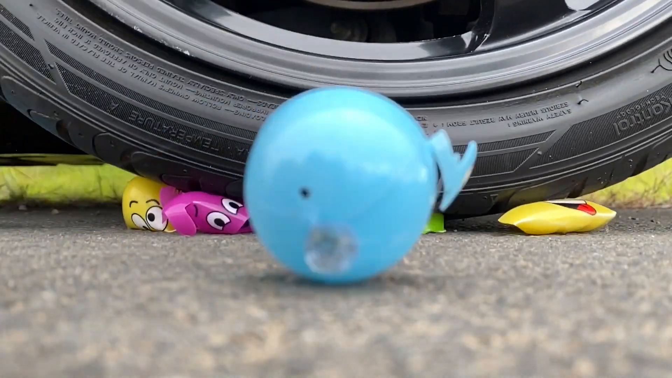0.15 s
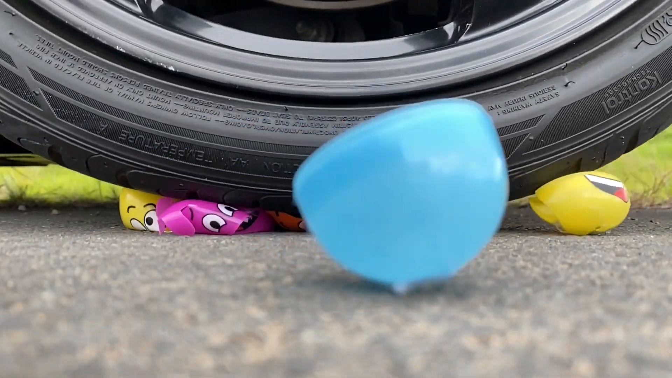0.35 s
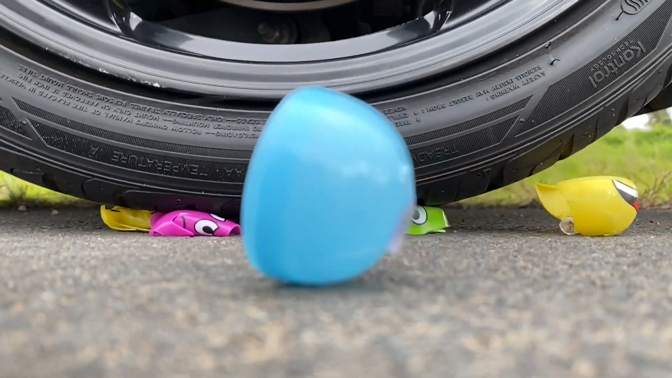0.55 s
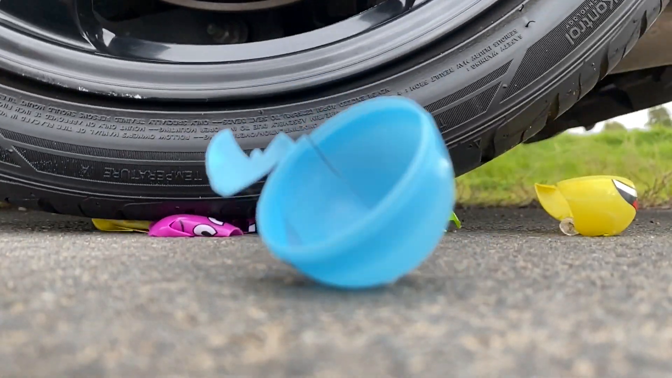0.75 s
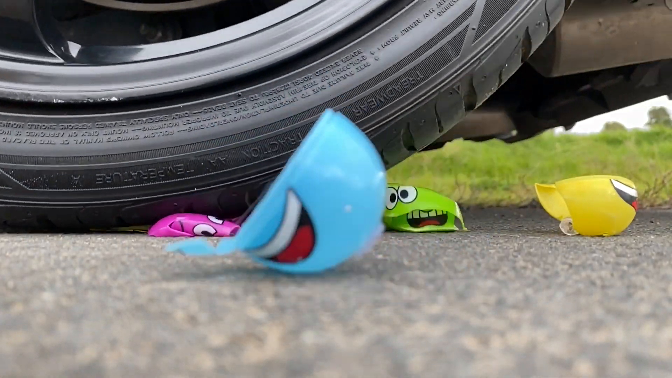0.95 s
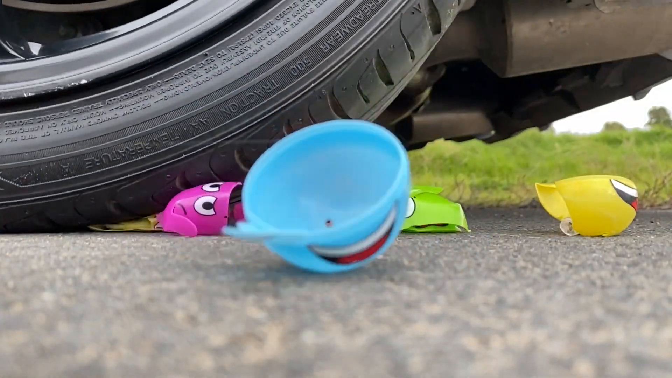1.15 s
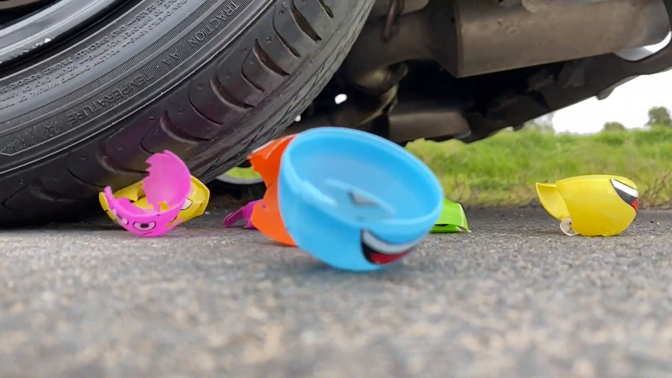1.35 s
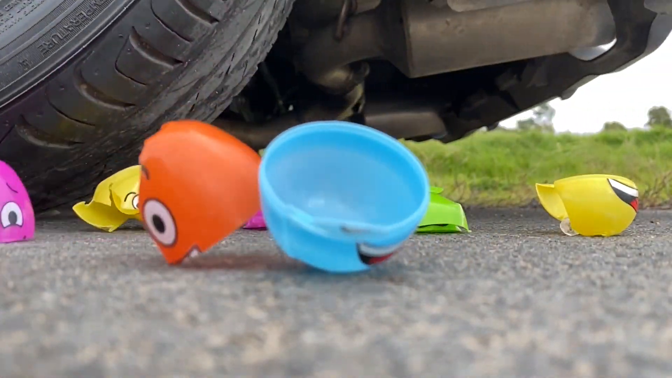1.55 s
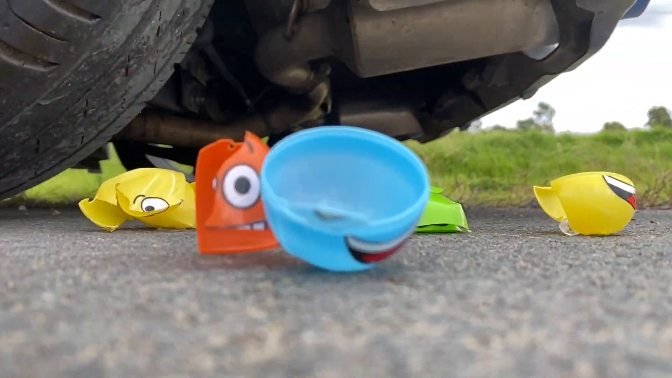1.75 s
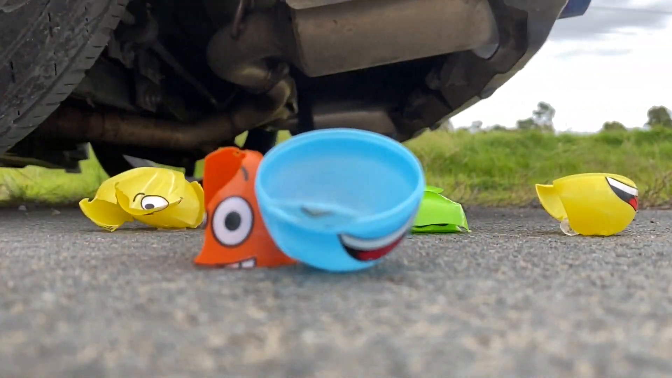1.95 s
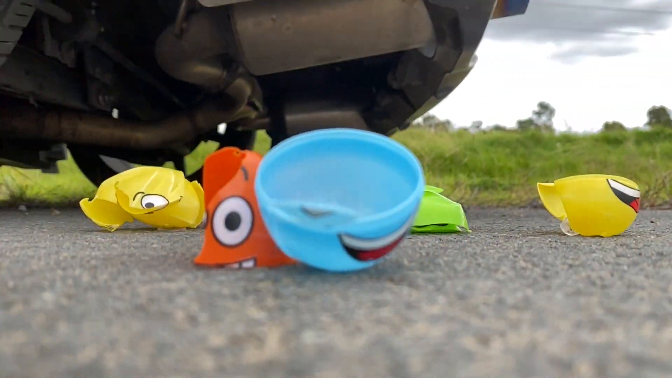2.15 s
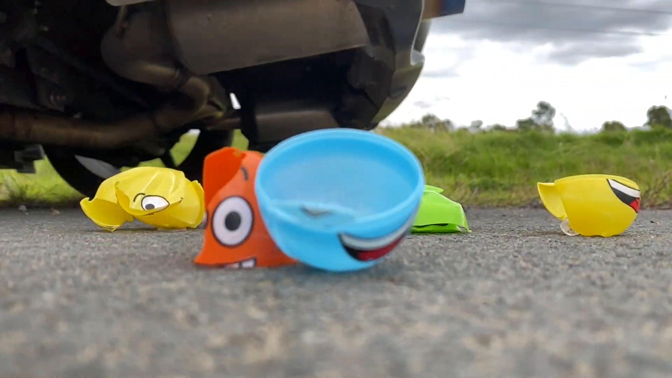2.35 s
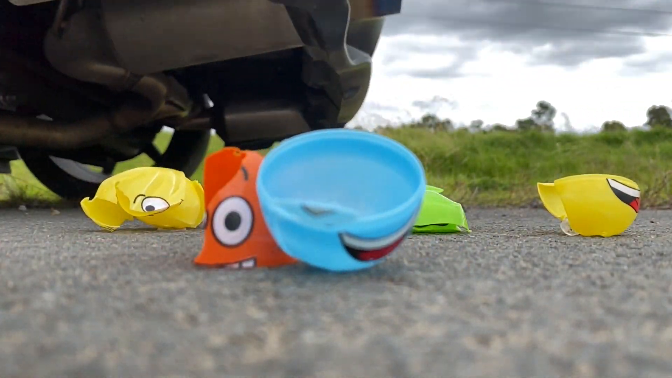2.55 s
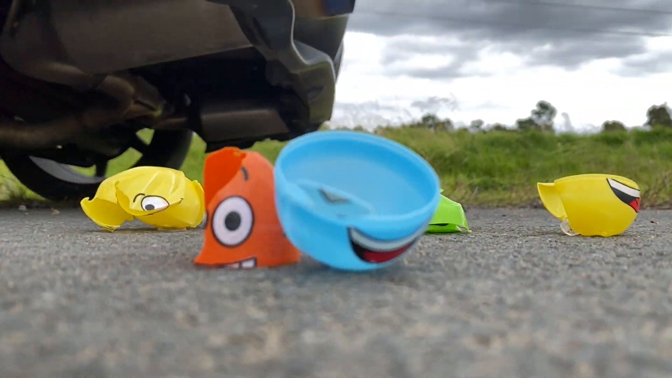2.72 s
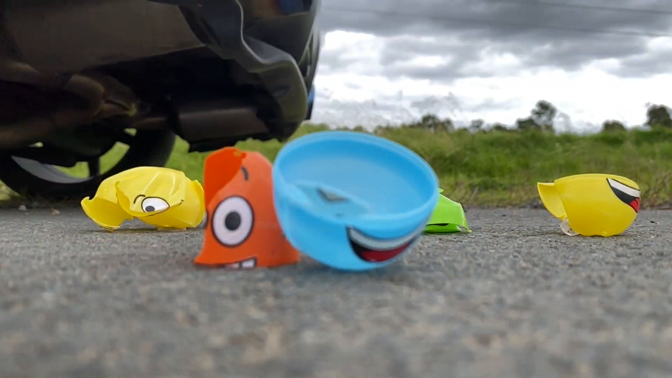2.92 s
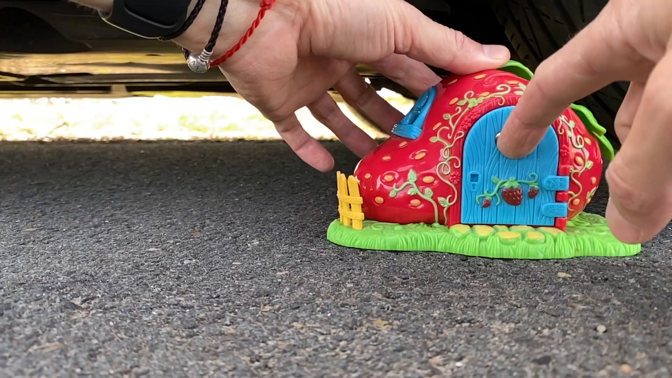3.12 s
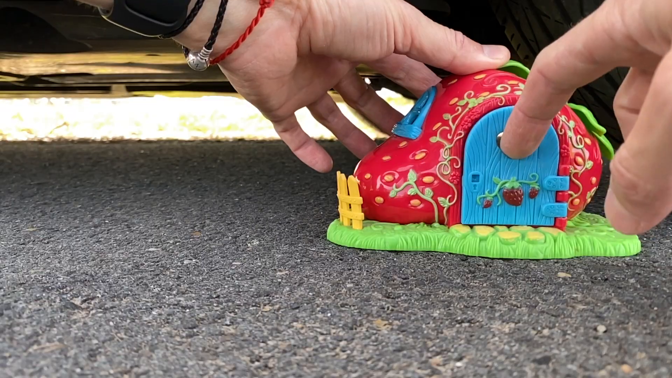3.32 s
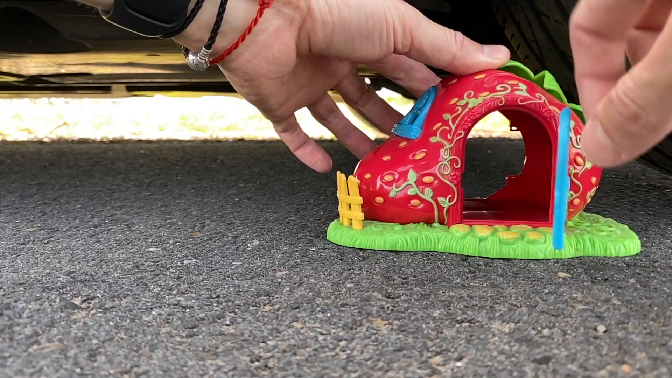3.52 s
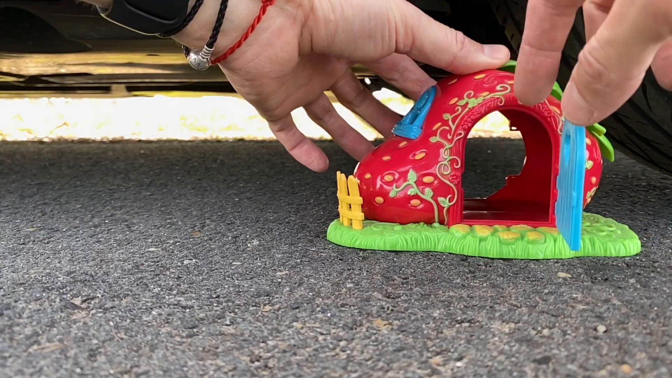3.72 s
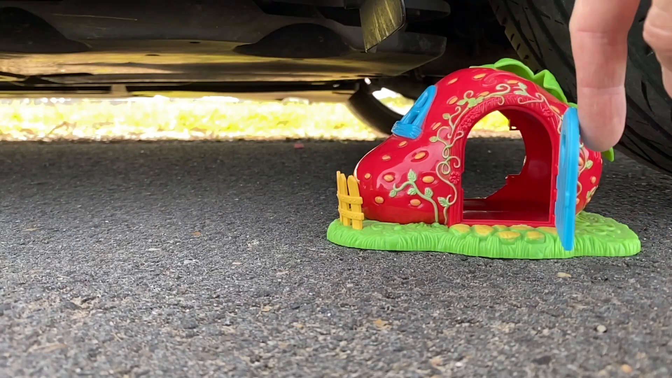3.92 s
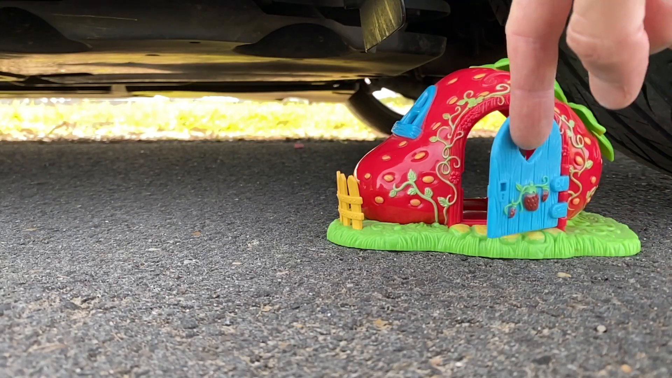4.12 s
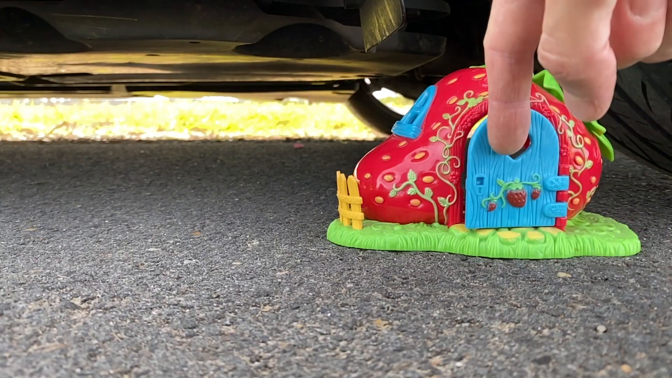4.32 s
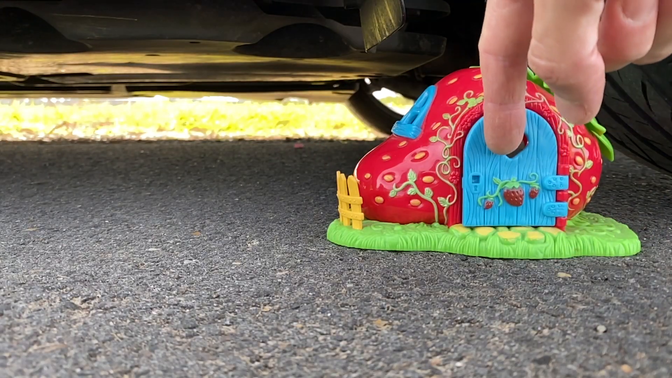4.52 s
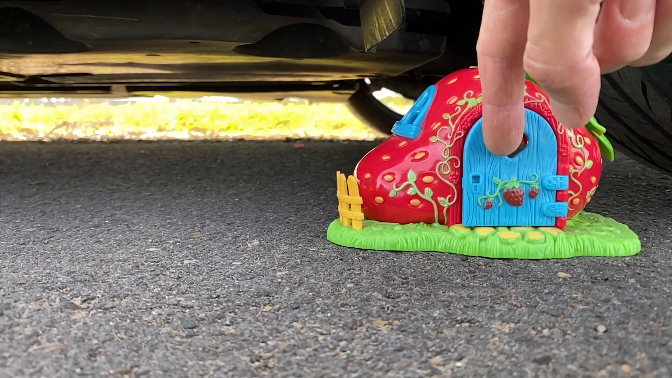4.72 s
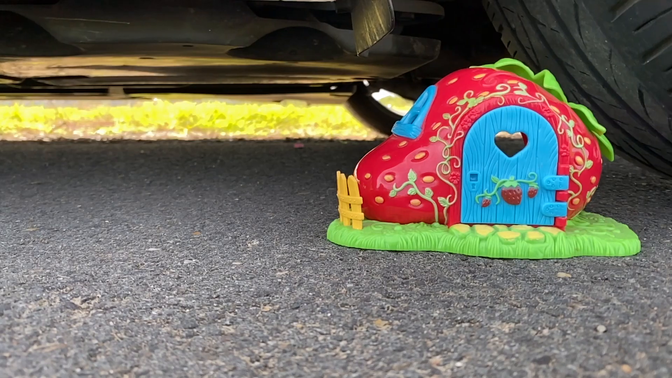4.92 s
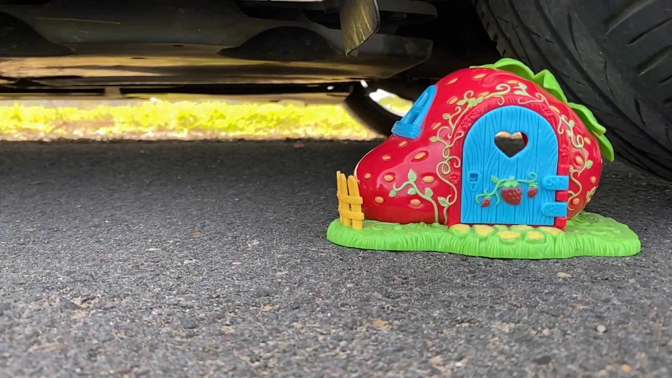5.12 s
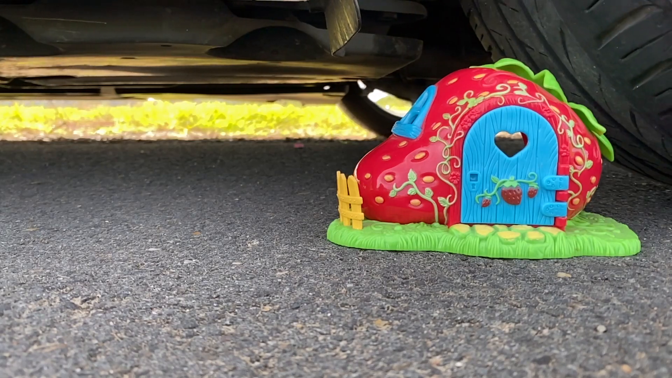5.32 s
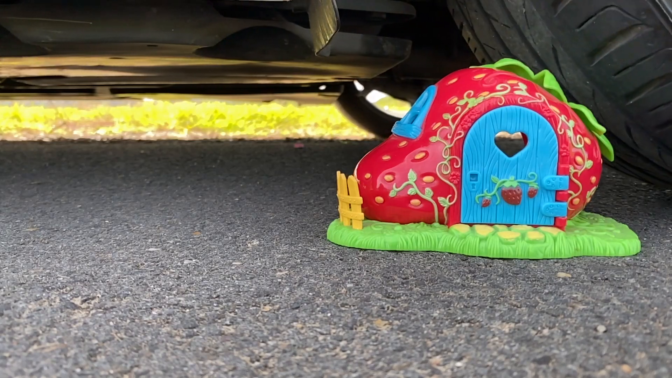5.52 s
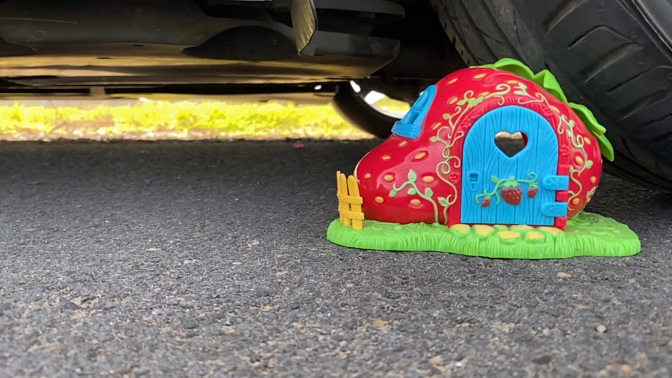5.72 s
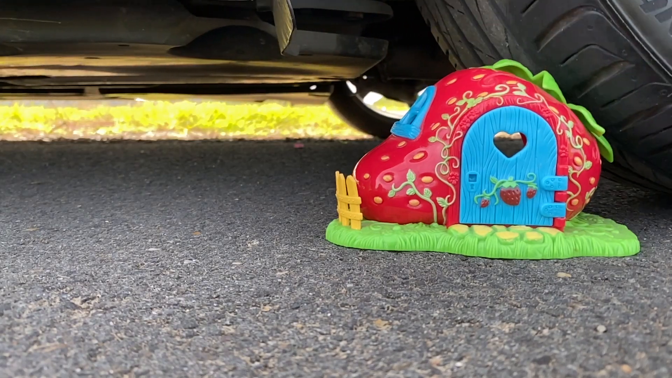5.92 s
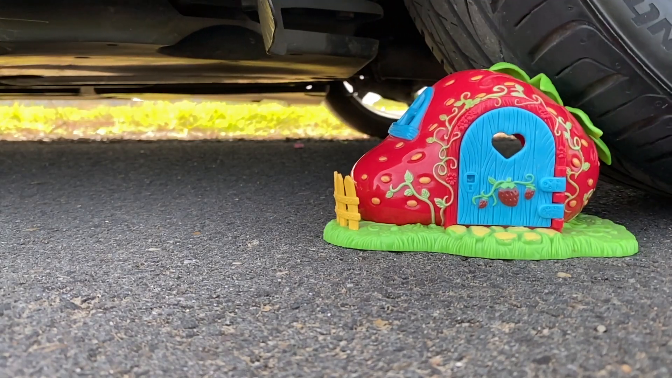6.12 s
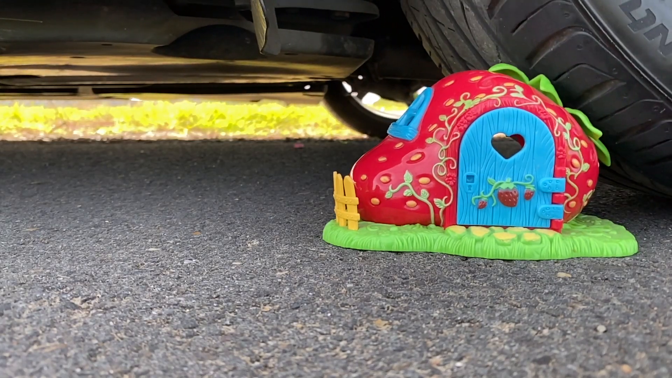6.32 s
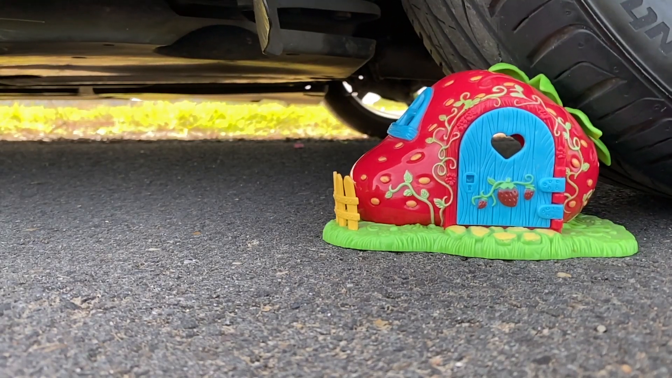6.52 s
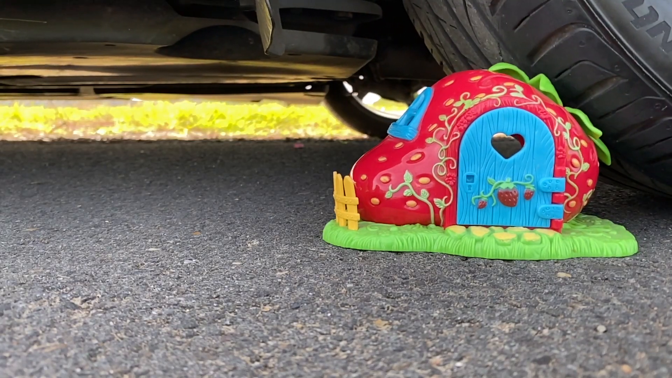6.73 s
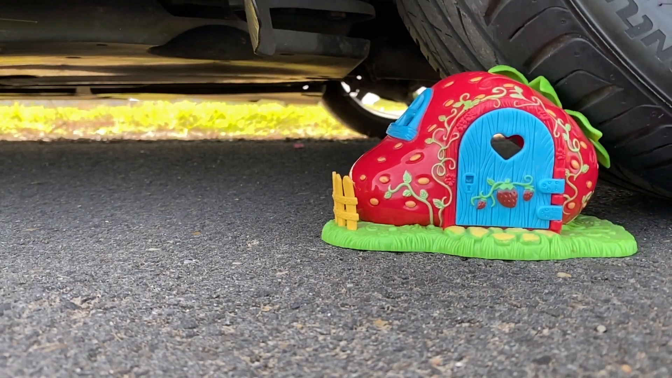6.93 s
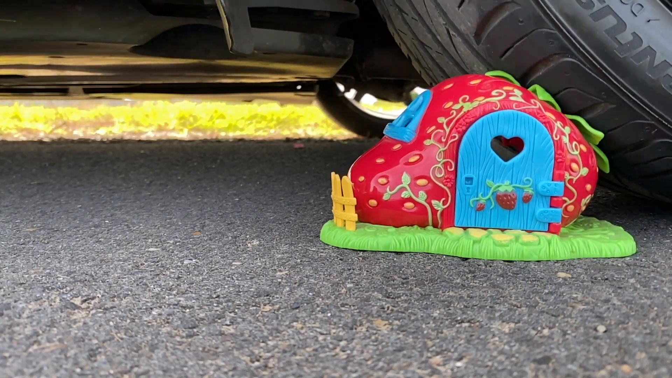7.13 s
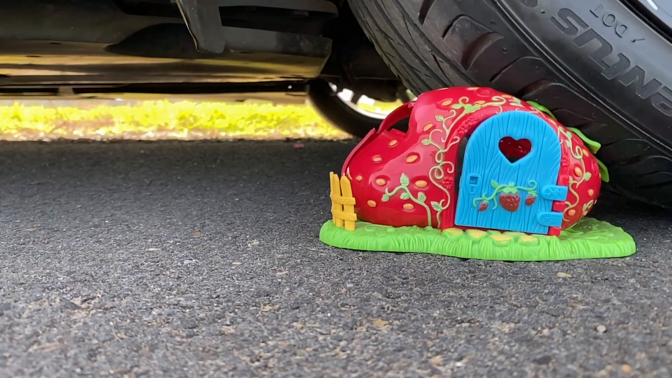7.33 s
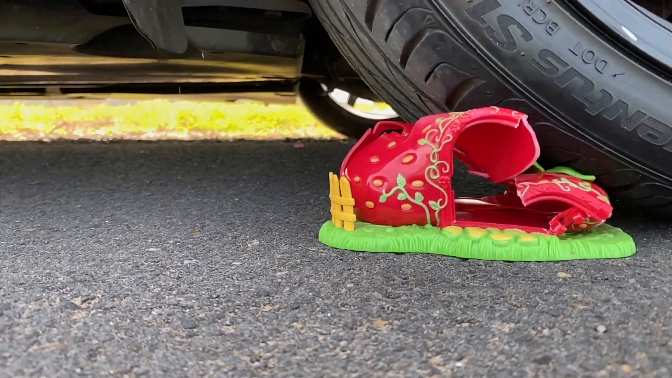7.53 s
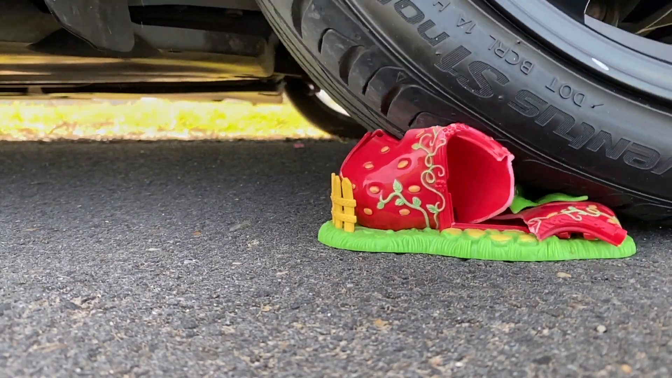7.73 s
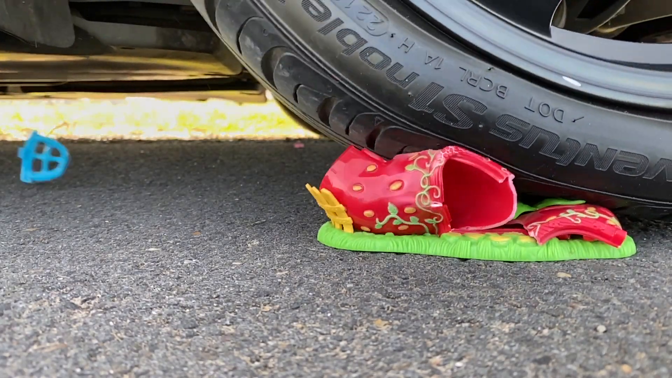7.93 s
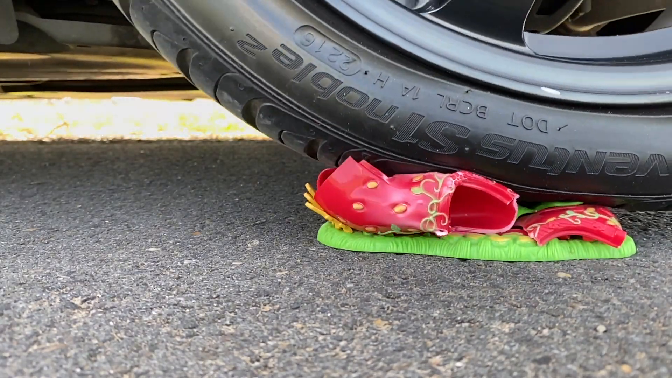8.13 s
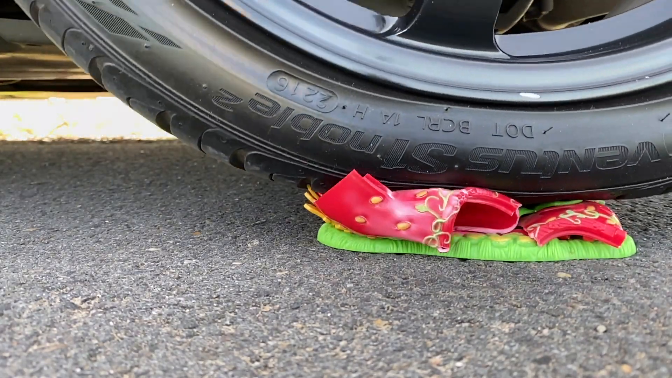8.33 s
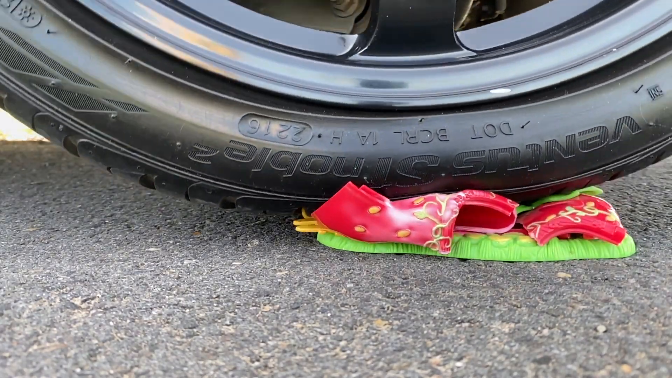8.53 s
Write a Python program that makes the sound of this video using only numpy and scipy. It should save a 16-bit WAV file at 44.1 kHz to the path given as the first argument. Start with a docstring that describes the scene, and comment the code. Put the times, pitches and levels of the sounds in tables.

```python
"""Three moments joined end to end, heard by a microphone on the asphalt beside a tyre.
First an idling car creeps over hollow plastic shells: firing-rate tones, snaps and hollow knocks (0 to 3.1 s).
Then, engine off, fingers tap and move the squeaky door of a toy house in light wind (to 4.8 s).
Last the engine is back and the car crushes the house, with bursting cracks and stick-slip creaks (to 8.7 s).
Wind and far traffic are shaped noise throughout; the loudest cracks overload the microphone."""
import sys
import numpy as np
from scipy import signal
from scipy.fft import rfft, irfft, next_fast_len
from scipy.io import wavfile
from scipy.ndimage import uniform_filter1d

SR = 44100
rng = np.random.default_rng(int(sys.argv[2]) if len(sys.argv) > 2 else 0)


def generate_wav(sig):
    """Save sig (samples, or channels by samples) to the path in sys.argv[1] as 16-bit PCM at SR."""
    pcm = np.round(np.clip(np.atleast_2d(sig).T, -1, 1) * 32767).astype(np.int16)
    wavfile.write(sys.argv[1], SR, pcm)


N = 381906
T = np.arange(N) / SR  # time of every sample, s


def undb(db):
    """Gain from dB."""
    return 10 ** (np.asarray(db) / 20)


def unit(x):
    """Scale to rms 1."""
    return x / np.sqrt(np.mean(x ** 2))


def curve(rows):
    """Interpolate the columns of (time_s, ..) rows at every sample."""
    s, *columns = np.transpose(rows)
    return [np.interp(T, s, c) for c in columns]


def gate(t0, t1, fade_s=0.0033):
    """1 between two times, with short linear fades outside them."""
    return np.clip(np.minimum(T - t0 + fade_s, t1 - T + fade_s) / fade_s, 0, 1)


def fade(t60):
    """0.2 s of decay that falls 60 dB in t60 s."""
    return 1000. ** (-np.arange(SR // 5) / (SR * t60))


def band(x, hz, width):
    """Two-pole resonance, gain 1 at the centre."""
    return signal.lfilter(*signal.iirpeak(min(hz, .4 * SR), hz / width, fs=SR), x)


def coloured(points):
    """Noise with a (pitch_hz, level_db) spectrum, rms 1."""
    hz, db = np.transpose(points)
    n = next_fast_len(N)
    f = np.maximum(np.arange(n // 2 + 1) * SR / n, 1)
    shape = undb(np.interp(np.log(f), np.log(hz), db))
    return unit(irfft(rfft(rng.standard_normal(n)) * shape, n)[:N])


def walk(rate):
    """Random wander with about rate new values per second, rms 1."""
    k = int(SR / rate)
    steps = np.repeat(rng.standard_normal(N // k + 1), k)
    return unit(uniform_filter1d(uniform_filter1d(steps, k), k)[:N])


def wraps(phase):
    """A unit pulse each time the phase passes a whole number."""
    return np.diff(np.floor(phase), prepend=0)


def add(out, s, x):
    """Mix x into out from time s."""
    i = int(s * SR)
    out[i:i + len(x)] += x[:N - i]


def engine():
    """Exhaust boom on the firing multiples, weaker half lines, a rasp of higher lines and engine bay noise."""
    # engine speed, one list per moment: time_s, firing_rate_hz, boom_level_db
    running = [
        [(0, 31.46, -0.5), (.27, 28.21, -4), (.52, 31.22, 0.5), (.75, 34.4, -0.5), (1.1, 33.17, 0),
         (1.59, 36.7, 1), (2.18, 37.74, 1.5), (2.75, 41.38, -0.5), (3.13, 41.42, -1.5)],
        [(4.82, 32.32, -4), (5.35, 34.35, -2.5), (5.75, 35.05, -3), (6.15, 34.47, -3), (6.58, 32.52, -3.5),
         (7.2, 28.76, -6.5), (7.45, 29.66, 2), (7.8, 35, 4.5), (8.06, 35.98, 3.5), (8.5, 30.64, -2.5),
         (8.66, 30.17, -1)],
    ]
    # balance, one list per moment: time_s, bay_noise_db, rasp_db, boom_tilt_db_per_octave (around 100 Hz),
    # half_lines_db
    bay_levels = [
        [(0, -41, -57, 2.5, -6), (1.3, -49, -46, -0.5, -14.5), (3.13, -47.5, -43, -2, -18.5)],
        [(4.82, -46.5, -57.5, 6, -6.5), (7.0, -46, -60.5, 3.5, -7), (8.66, -38.5, -60, 0.5, -7)],
    ]
    # exhaust pipe response to a firing multiple: pitch_hz, gain_db
    exhaust = [(30, -46), (36, -33.5), (42, -21), (60, -31), (73, -20.5), (86, -11), (97, -16), (108, -22),
               (121, -34), (143, -27), (160, -24.5), (185, -37)]
    # exhaust rasp resonances: pitch_hz, width_hz, level_db
    buzz = [(205, 55, 3.5), (271.5, 29, -6), (419, 93, 2.5)]
    # engine bay noise spectrum: pitch_hz, level_db (per Hz)
    clatter = [(150, -31), (200, -8), (310, -22.5), (505, -21), (800, -28), (1440, -27), (2650, -36),
               (9000, -49), (14000, -63)]
    out = 0
    pipe_hz, pipe_db = np.transpose(exhaust)
    for speed, levels in zip(running, bay_levels):
        hz, boom_db = curve(speed)
        noise_db, rasp_db, tilt_db, half_db = curve(levels)
        phase = np.cumsum(hz * (1 + .003 * walk(12))) / SR

        def tone(k, db):
            """Sine on k times the firing rate, weighted by the pipe."""
            pipe = np.interp(np.log(k * hz), np.log(pipe_hz), pipe_db)
            level_db = boom_db + db + tilt_db * np.log2(k * hz / 100) + pipe
            return np.sqrt(2) * undb(level_db) * np.sin(2 * np.pi * (k * phase + rng.random()))

        boom = sum(tone(k + 1, 1.2 * walk(9)) for k in range(5))
        # uneven cylinders add lines halfway between the multiples
        boom = boom + sum(tone(k + .5, half_db) for k in range(3, 6))
        # one pulse per two firings gives lines on every half multiple
        pulses = wraps(phase / 2) * undb(1.6 * walk(27)) + 1.2 * wraps(phase)
        # the silencer smears each pulse over the cycle
        pulses = signal.fftconvolve(pulses, rng.standard_normal(SR // 5) * fade(0.093))[:N]
        pulses = unit(pulses) * (1 + 0.36 * walk(250))
        rasp = sum(undb(db) * unit(band(band(pulses, f, w), f, w)) for f, w, db in buzz)
        # the bay noise swells slightly with each firing
        noise = coloured(clatter) * (1 + 0.076 * np.cos(2 * np.pi * phase)) * undb(.7 * walk(15))
        sound = boom + rasp * undb(rasp_db) + noise * undb(noise_db)
        out = out + gate(speed[0][0], speed[-1][0]) * sound
    return out


def outdoors():
    """Low noise in gusts on the microphone, and steadier noise of far traffic."""
    # wind spectrum: pitch_hz, level_db (per Hz)
    wind = [(12, -5.5), (24, -8), (113, -25.5), (300, -51.5), (800, -110)]
    # gust strength ahead of its quick flutter: time_s, level_db
    gusts = [(3.2, -41), (3.8, -47), (4.3, -36.5), (4.8, -45)]
    # far traffic spectrum: pitch_hz, level_db (per Hz)
    traffic = [(150, -37.5), (250, -11.5), (800, -11), (2000, -23), (11000, -71.5)]
    blowing = coloured(wind) * undb(curve(gusts)[0] + 5.9 * walk(13))
    return blowing + coloured(traffic) * undb(-69 + 0.6 * walk(4))


def crunch(rate=700, spread_db=4.5):
    """Dense small splinter clicks (rate per s in each band) of random size and colour."""
    # splintering between the cracks, one list per moment: time_s, level_db (before the bands are summed)
    splintering = [
        [(0, -39.5), (.3, -57), (.7, -60.5), (1.2, -47.5), (1.95, -69)],
        [(6.8, -71), (7.3, -43), (8.0, -42), (8.66, -44.5)],
    ]
    out = 0
    tail = np.exp(-np.arange(400) / (0.0012 * SR))
    for hz, db in ((1500, 4.5), (3300, 1.5), (7500, -5.0), (11500, -14.0)):
        chance = rng.random((N, 2)).T
        clicks = (chance[0] < rate / SR) * undb(-spread_db * np.log(chance[1] + 0.014))
        grains = signal.fftconvolve(clicks, tail)[:N] * rng.standard_normal(N)
        out = out + undb(db) * unit(band(grains, hz, 0.56 * hz))
    level = sum(gate(rows[0][0], rows[-1][0]) * undb(curve(rows)[0]) for rows in splintering)
    return level * out


def snap(t60, hz, tonal=0.42, count=6):
    """One fracture, peak 1: a sharp release and noise burst ring a main and weaker modes; the tail is duller."""
    noise = rng.standard_normal((2, SR // 5))
    burst = noise[0] * fade(t60)
    burst[0] = 3.2  # the release
    fragment_hz = hz * 2 ** rng.uniform(-1.496, 1.2, size=count)
    modes = band(burst, hz, hz / 8) + 0.42 * sum(band(burst, f, f / 9) for f in fragment_hz)
    y = (1 - tonal) * band(burst, 3500, 6500) + tonal * 5.0 * modes
    y = y + 0.074 * band(noise[1] * fade(1.5 * t60 + 0.072), 1800, 2600)
    return y / np.max(np.abs(y))


def ticks(t60=0.0084):
    """Short snaps and cracks, each with its own colour: the clear ones, then faint ones at random."""
    # snaps and cracks given by time and peak only, played short with no hollow knock: start_s, peak_db
    clear = [(0.019, -10.5), (0.039, -7), (0.046, -9.5), (0.054, -3.5), (0.0777, -4.5), (0.148, -0.5),
             (0.168, -19), (0.2102, -11), (0.339, -14.5), (0.401, -24), (0.4574, -3), (0.4741, -1),
             (0.5722, -4), (0.8626, -12), (0.9221, -10), (0.936, -11), (0.9721, -17), (1.1451, 2),
             (1.1576, -9), (1.1909, -2.5), (1.4479, -18), (1.5627, -15), (1.6633, -17.5), (1.8211, -17.5),
             (5.9288, -23.5), (6.0338, -35), (6.2316, -34.5), (6.607, -40.5), (6.908, -24), (7.12, -19.5),
             (7.1879, -1), (7.2629, 5), (7.3915, 13), (7.448, 11), (7.465, 6), (7.6311, 8), (7.64, 7),
             (7.6671, 11.5), (7.779, 10.5), (7.9158, 5), (8.4925, 3)]
    # scattered faint snaps, one list per moment: time_s, snaps_per_s
    patter = [
        [(0, 120), (.75, 20), (.9, 144), (1.4, 100), (1.9, 37)],
        [(6.85, 26), (7.3, 90), (8.66, 40)],
    ]
    floor_db, spread_db = -40, 4.5
    out = np.zeros(N)
    rate = sum(gate(rows[0][0], rows[-1][0]) * curve(rows)[0] for rows in patter)
    chance = rng.random((N, 2)).T
    starts = np.flatnonzero(chance[0] < rate / SR)
    faint = [(i / SR, floor_db - spread_db * np.log(chance[1, i] + 0.027)) for i in starts]
    for s, db in clear + faint:
        add(out, s, undb(db) * snap(t60, 3600 * 2 ** rng.uniform(-0.99, 1.0), tonal=0.4))
    return out


def cracks():
    """Fractures; the broken piece pings at its own pitch, and each also knocks the hollow body."""
    # fractures: start_s, snap_peak_db, ring_s (60 dB decay), main_pitch_hz, hollow_db (against the snap)
    fractures = [(0.0895, -0.5, 0.032, 1670, -27), (0.139, 0.5, 0.01, 2590, -29),
                 (0.3692, -7.5, 0.017, 3900, -41), (0.427, 10, 0.033, 1660, -11),
                 (0.5093, -4.5, 0.013, 1500, -11.5), (1.051, -14, 0.06, 1740, -13),
                 (1.084, 1, 0.079, 1400, -8), (1.1036, 4.5, 0.049, 2010, -37),
                 (1.28, -1.5, 0.024, 1209, -10), (7.226, 6, 0.065, 2480, -14.5),
                 (7.2759, 7.5, 0.069, 3010, -8.5), (7.3165, -8, 0.05, 1200, 5),
                 (7.3408, 9, 0.015, 8450, -24), (7.3681, 0, 0.024, 1720, -6), (7.4124, 9, 0.11, 7960, -8),
                 (7.4309, 10, 0.081, 2680, -13.5), (7.5336, 2.5, 0.058, 1231, -12),
                 (7.5541, 12, 0.059, 1870, -19.5), (7.654, 3.5, 0.06, 1545, -11),
                 (7.7865, 2.5, 0.036, 5440, -20.5), (7.8619, 10, 0.03, 1805, -24),
                 (7.8906, 2.5, 0.063, 2130, -5), (8.035, 3.5, 0.065, 2140, -13),
                 (8.2615, 4.5, 0.022, 3030, -17), (8.5422, 10.5, 0.035, 2670, -9.5)]
    # modes of the hollow body: pitch_hz, level_db, decay_s (60 dB)
    shell = [(226, -7, 0.33), (436, -7, 0.16), (649, -2.5, 0.24), (1117, 4.5, 0.046)]
    out, t = np.zeros(N), np.arange(SR // 5) / SR
    for s, db, t60, hz, hollow_db in fractures:
        # each blow excites the modes in a different balance
        strike = undb(1.5 * rng.standard_normal(len(shell)))
        ring = sum(g * undb(d) * np.sin(2 * np.pi * f * t) * fade(d60)
                   for g, (f, d, d60) in zip(strike, shell))
        knock = band(rng.standard_normal(len(t)) * fade(t60 + 0.062), 310, 1400)
        hollow = undb(-15.5) * ring + knock / np.max(np.abs(knock))
        ping = .22 * np.sin(2 * np.pi * hz * t) * fade(t60 / 2)
        add(out, s, undb(db) * (snap(t60, hz) + ping + undb(hollow_db) * hollow))
    return out


def shoves():
    """Slow pressure humps as a shell bursts."""
    # air squeezed out at the microphone: start_s, length_s, peak_db
    squeezes = [(1.094, 0.0056, 5), (7.43, 0.032, -3.5)]
    return sum(undb(db) * np.exp(-((T - s - d / 2) / (d / 2)) ** 2) for s, d, db in squeezes)


def finger_taps():
    """Fingers on the plastic door: a small snap, with a soft scrape of banded noise before each."""
    # taps: start_s, peak_db
    taps = [(3.275, -58), (3.385, -49), (3.4732, -52.5), (3.651, -39), (3.802, -42), (4.461, -46.5)]
    door_hz = 1756
    out = np.zeros(N)
    for s, db in taps:
        add(out, s, undb(db) * snap(0.028, door_hz))
        rub = band(band(rng.standard_normal(2200), 2200, 2500), 2210, 2500)
        add(out, s - .035, undb(-58.5) * np.hanning(2200) * rub)
    return out


def hinge_squeaks():
    """The broken, wobbling squeak of the plastic hinge: nine unsteady harmonics and a little noise."""
    # squeaks: start_s, length_s, first_pitch_hz, glide_hz_per_s, loudest_level_db
    squeaks = [(4.109, 0.043, 644, -1300, -54.5), (4.145, .058, 643, 149, -50),
               (4.23, 0.075, 640, -400, -54)]
    edge_db, peak_at = -9.5, 0.59  # level at both ends; loudest at this share of the length
    out = np.zeros(N)
    for s, length, first_hz, glide, peak_db in squeaks:
        db = peak_db + np.interp(T - s, [0, peak_at * length, length], [edge_db, 0, edge_db])
        hz = first_hz + glide * np.clip(T - s, 0, length)
        phase = np.cumsum(hz * (1 + 0.0306 * walk(400) + 0.011 * walk(30))) / SR
        squeak = sum(undb(-8 * max(k - .6, 0) + 2.6 * walk(76)) * np.sin(2 * np.pi * (k + 1) * phase)
                     for k in range(9))
        breath = undb(-18) * unit(band(rng.standard_normal(N), 2440, 2540))
        out += gate(s, s + length, 0.005) * undb(db) * (squeak + breath)
    return out


def creak():
    """Stick-slip of a bending wall: slowing slips, each the same short jolt ringing the wall, plus a puff of grit."""
    # wall slipping under the tread: start_s, length_s, slips_per_s, extra_slips_per_s (at first),
    # wall_pitch_hz, slip_level_db
    slipping = [(7.6936, 0.063, 81, -1, 2750, -9), (8.1061, .14, 98, 75, 2562, -9.5)]
    # wall resonances: pitch and width (as shares of the wall pitch), level_db
    wall = [(.45, 0.23, -1), (.68, .09, 3.5), (1, .12, 6.5), (1.36, .12, 1), (1.8, .3, 3),
            (2.9, 0.22, -0.5)]
    sag_hz_per_s, slowing_s = 200, 0.013
    rise_db, rise_s = -9, 0.023  # level at the start, and the time to full level
    out = 0
    for s, length, hz, rush_hz, wall_hz, db in slipping:
        age = np.maximum(T - s, 0)
        rate = hz - sag_hz_per_s * age + rush_hz * np.exp(-age / slowing_s)
        onset_db = rise_db * np.clip(1 - age / rise_s, 0, 1)
        on = (T >= s) & (T < s + length)
        slips = wraps((T >= s) + np.cumsum(rate * on) / SR) * undb(db + onset_db + 1.0 * walk(200))
        # the jolt holds full strength for about 1 ms, then decays
        jolt = rng.standard_normal(SR // 5) * np.minimum(fade(0.0096) / 0.5029, 1)
        grit = signal.fftconvolve(slips, fade(0.037))[:N] * rng.standard_normal(N)
        push = 0.93 * signal.fftconvolve(slips, jolt)[:N] + undb(18) * slips + 1.08 * grit
        out = out + sum(undb(d) * band(push, f * wall_hz, w * wall_hz) for f, w, d in wall)
        out = out + 0.34 * band(push, 3000, 6000)
    return out


def scene():
    """All sources at the one microphone."""
    car = engine() + crunch() + ticks() + cracks() + shoves() + creak()
    return (car + outdoors() + finger_taps() + hinge_squeaks())[None]


def record(dry):
    """The microphone stage flattens loud peaks, then the top is cut."""
    clip, top_hz = .52, 16200
    flat = dry / (1 + np.abs(dry / clip) ** 5) ** (1 / 5)
    return signal.sosfilt(signal.ellip(10, .2, 70, top_hz, fs=SR, output="sos"), flat)


dry = scene()
out = record(dry)
generate_wav(out)
```